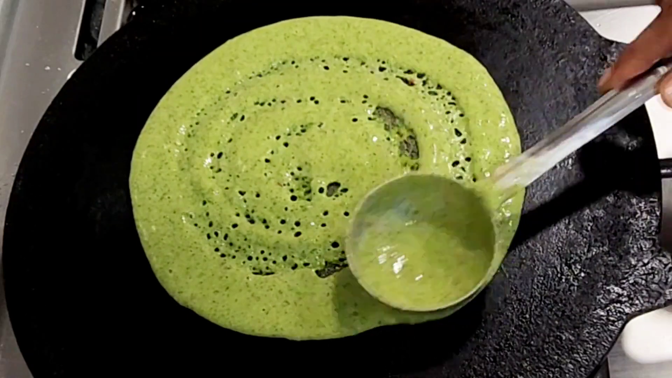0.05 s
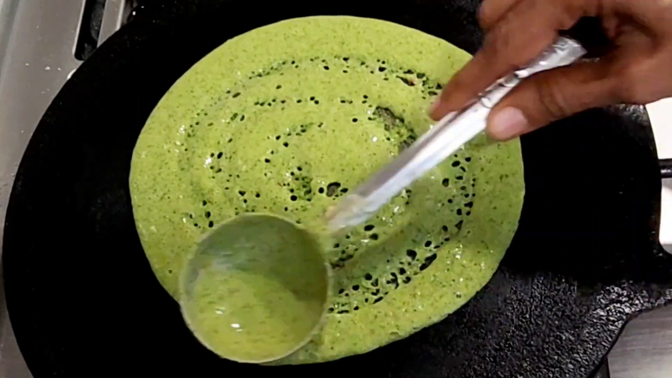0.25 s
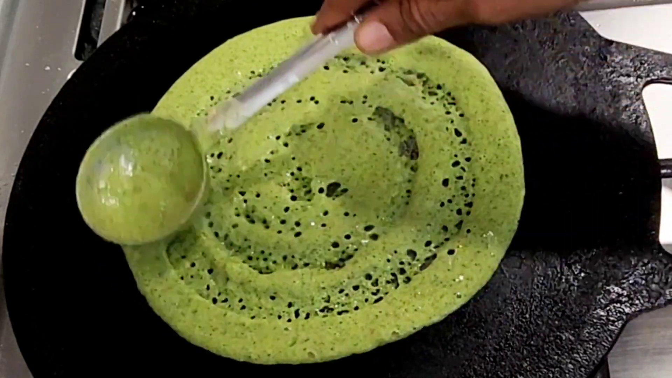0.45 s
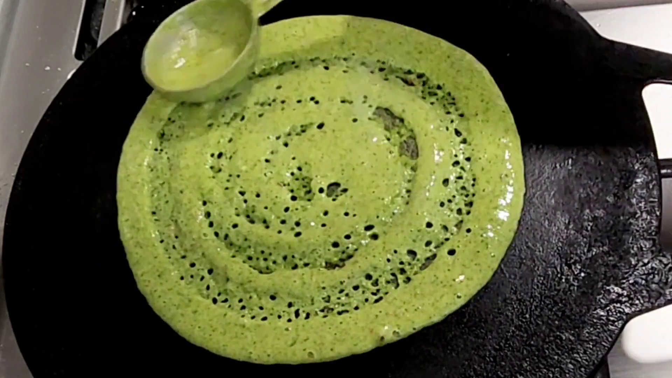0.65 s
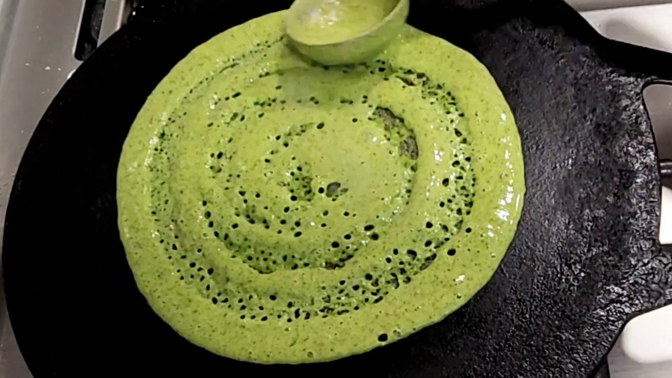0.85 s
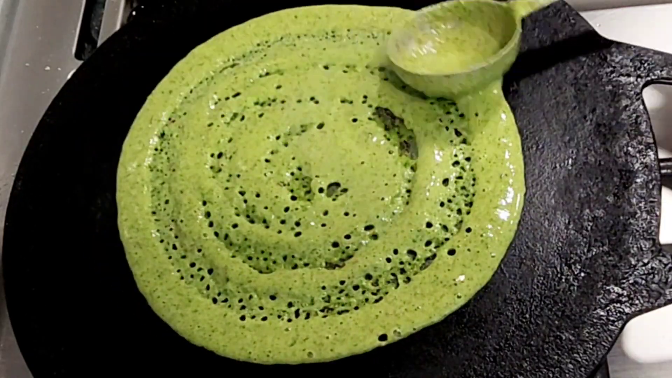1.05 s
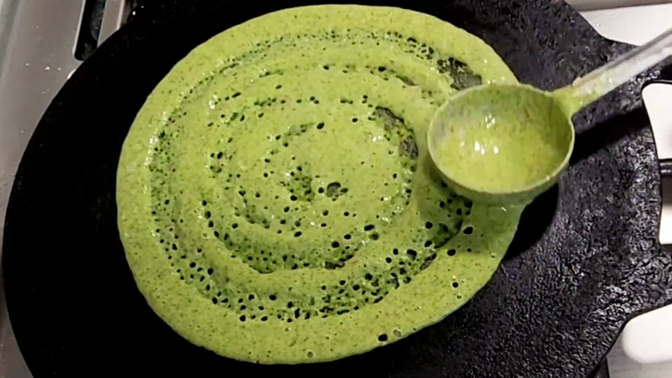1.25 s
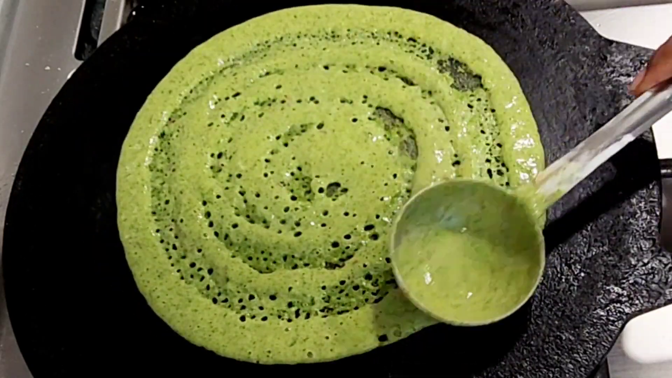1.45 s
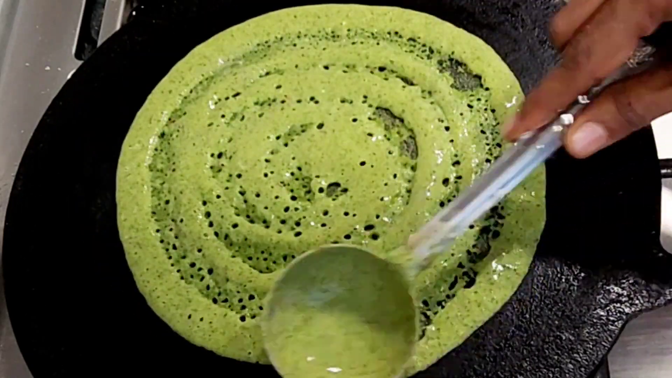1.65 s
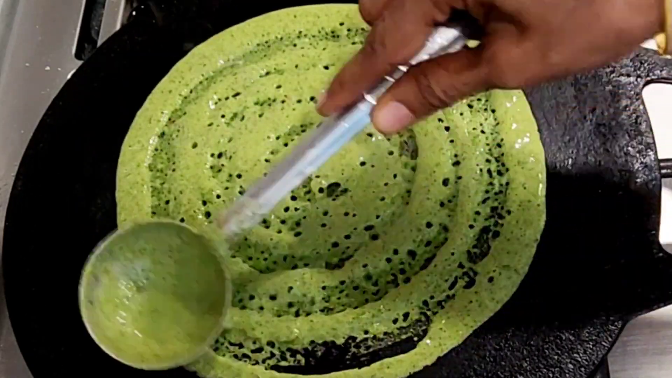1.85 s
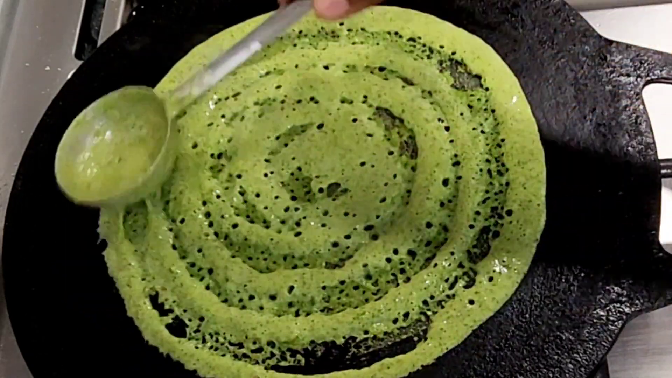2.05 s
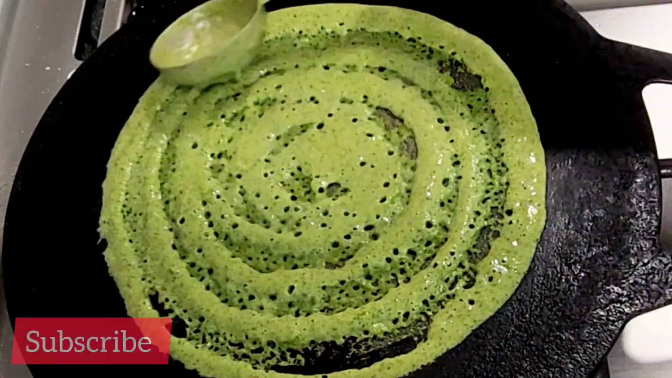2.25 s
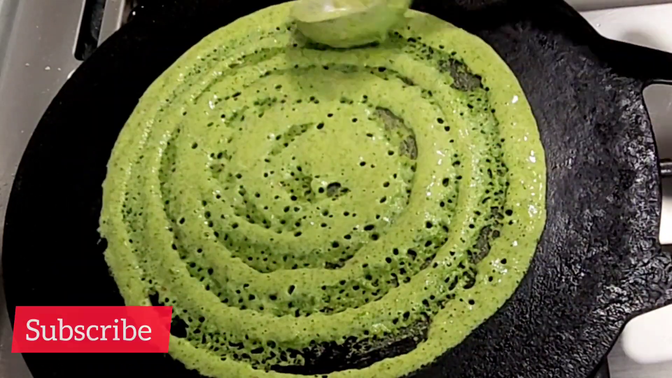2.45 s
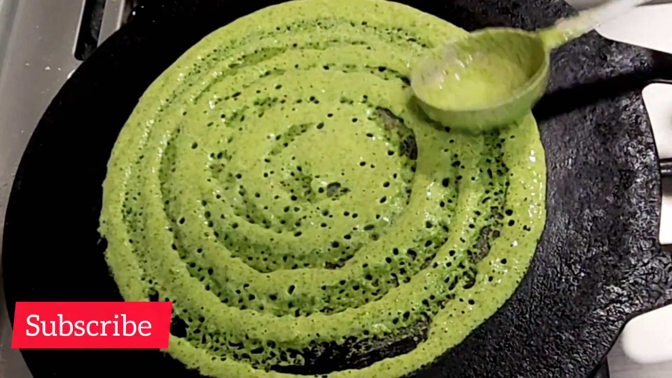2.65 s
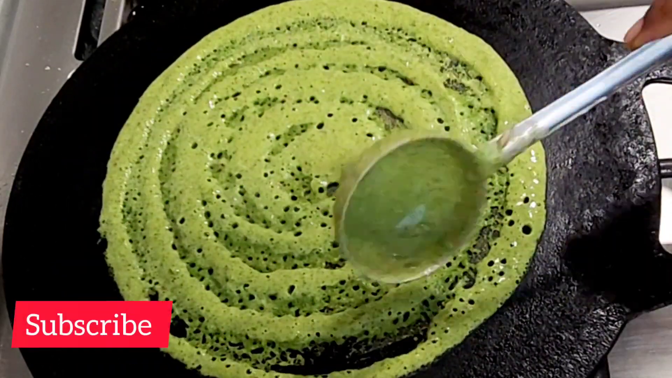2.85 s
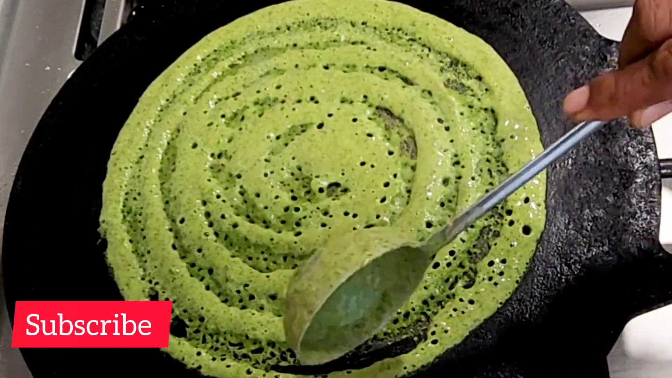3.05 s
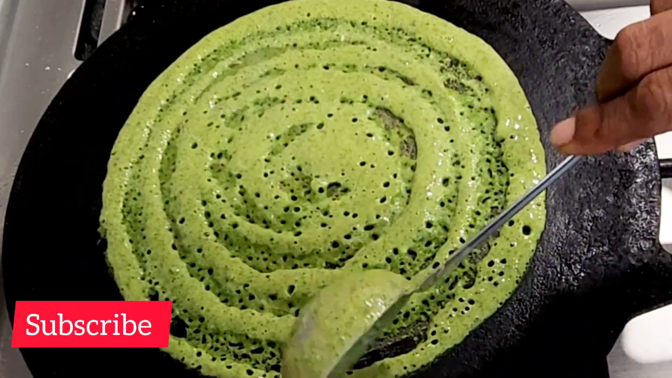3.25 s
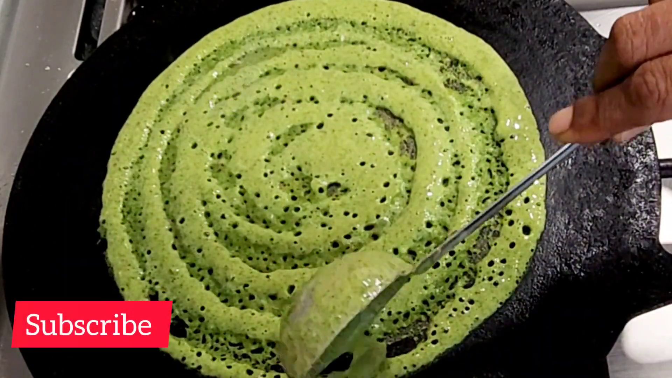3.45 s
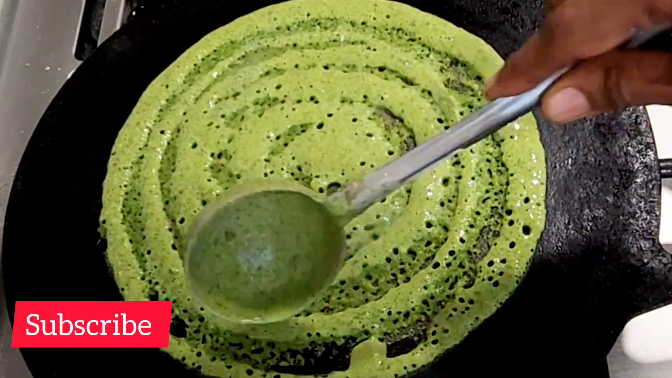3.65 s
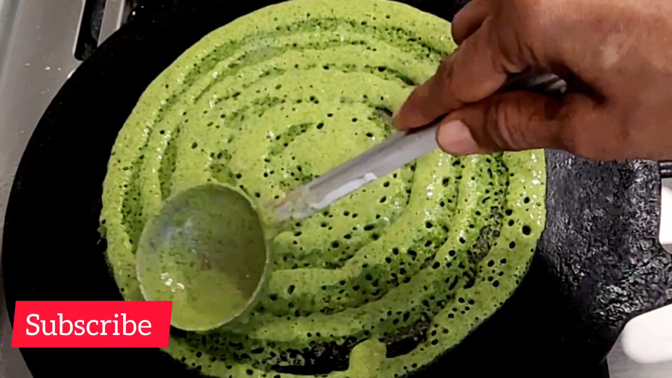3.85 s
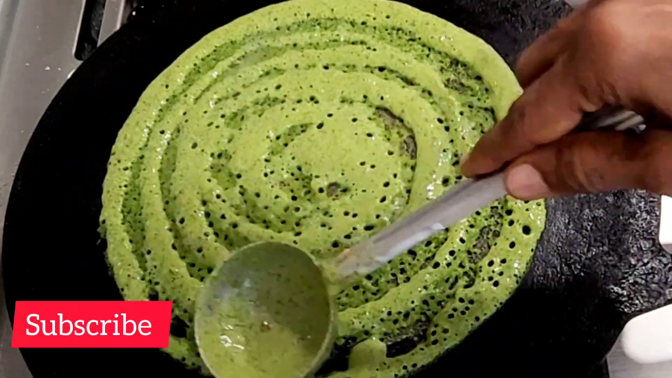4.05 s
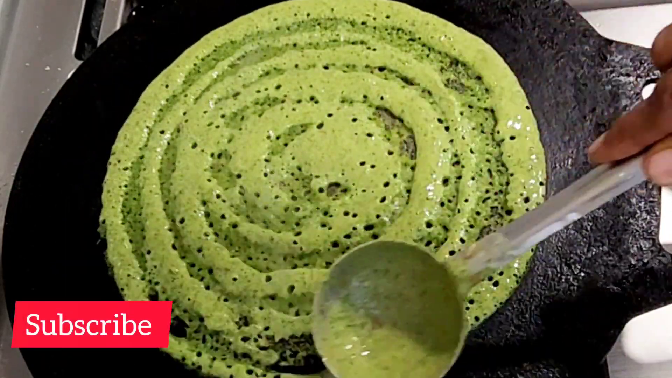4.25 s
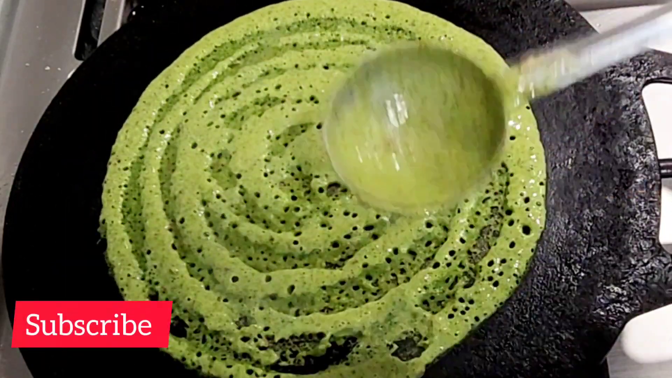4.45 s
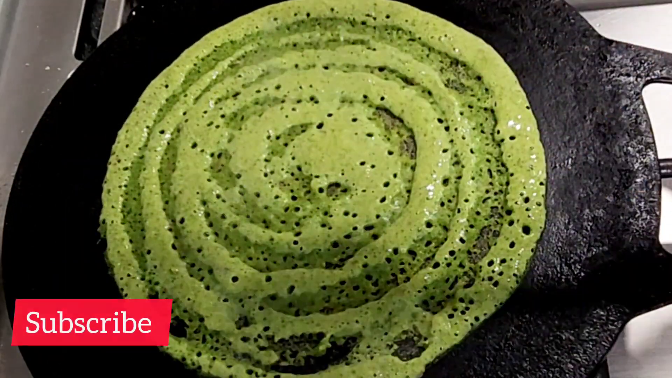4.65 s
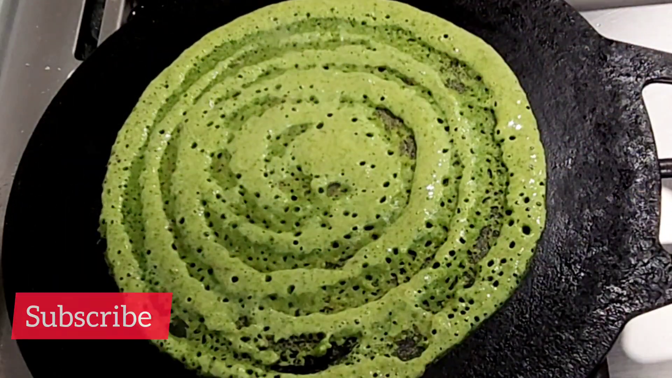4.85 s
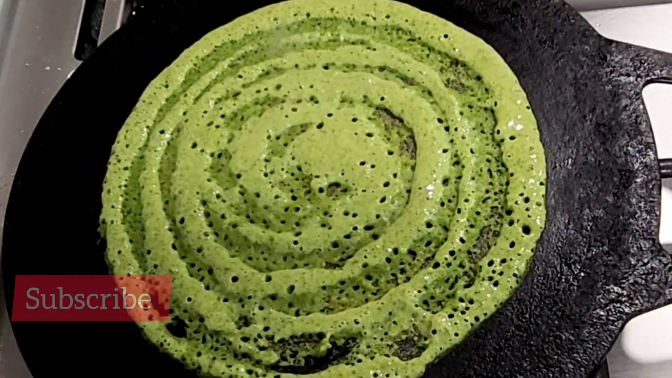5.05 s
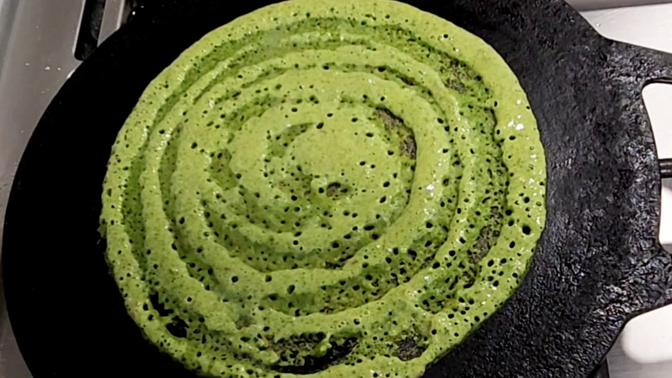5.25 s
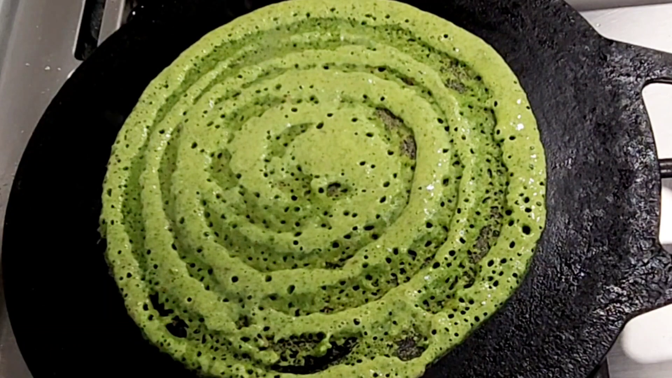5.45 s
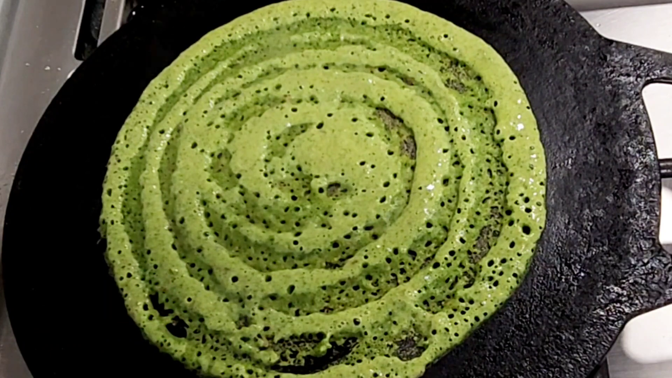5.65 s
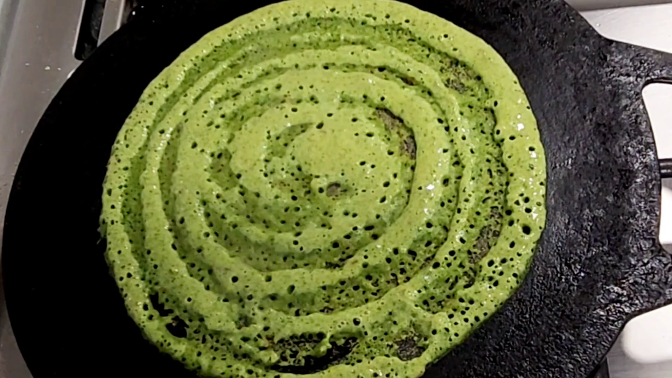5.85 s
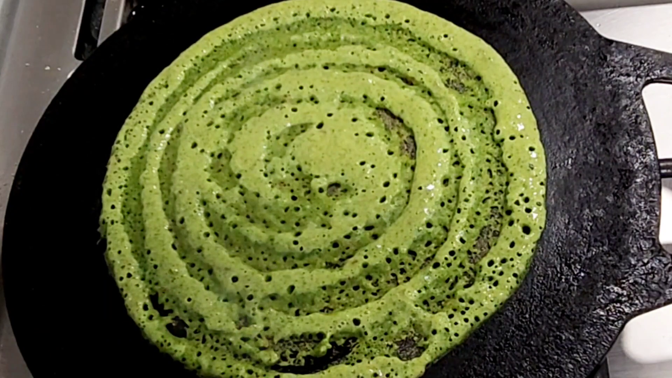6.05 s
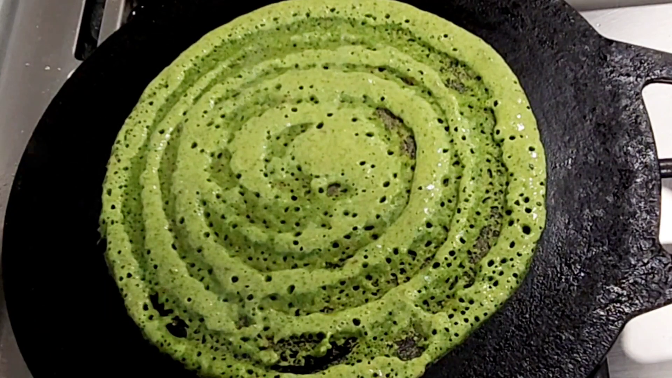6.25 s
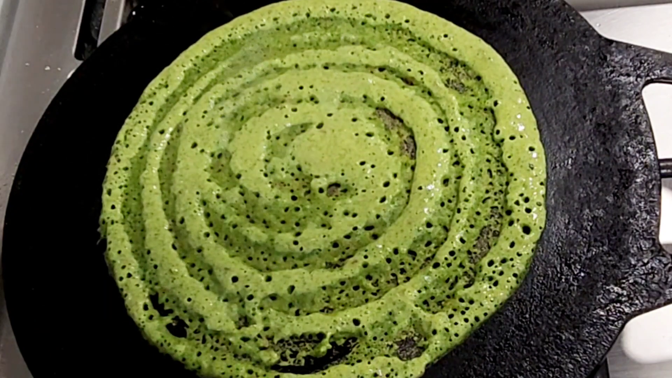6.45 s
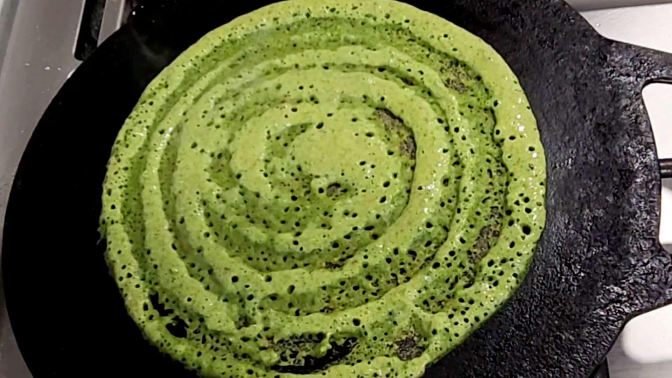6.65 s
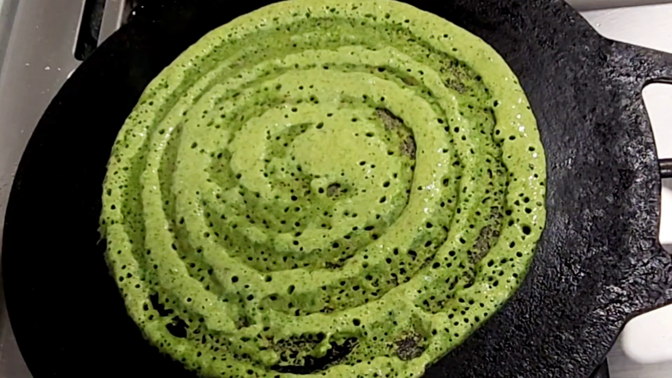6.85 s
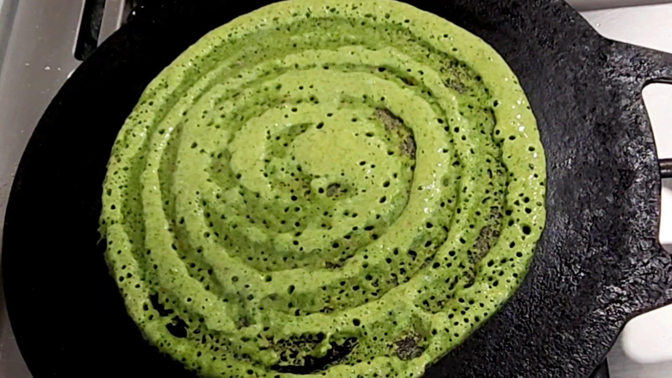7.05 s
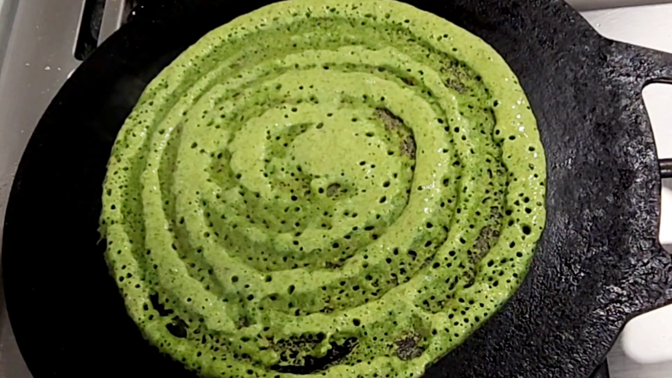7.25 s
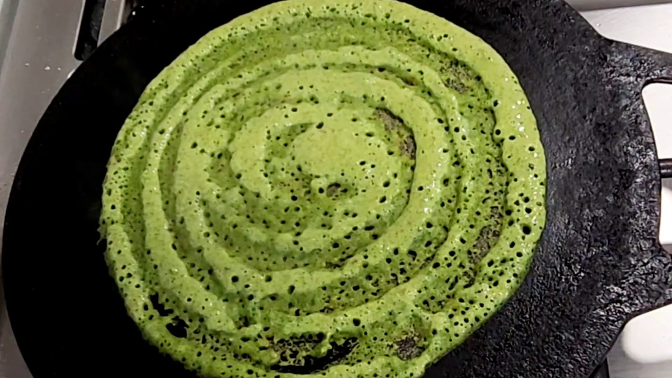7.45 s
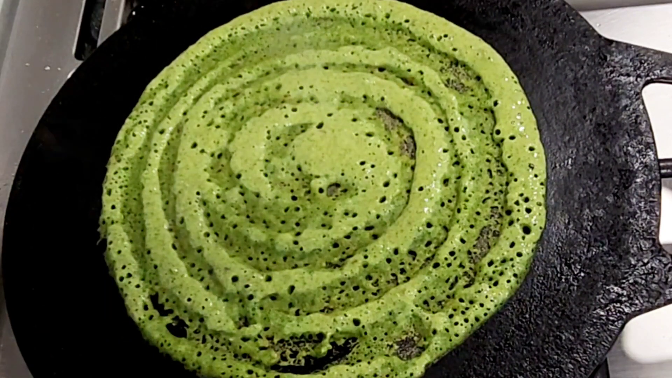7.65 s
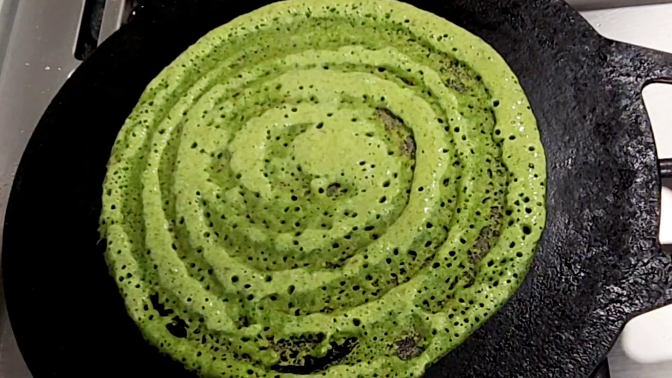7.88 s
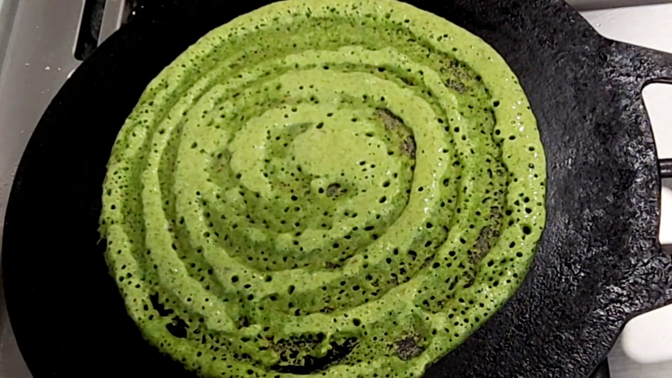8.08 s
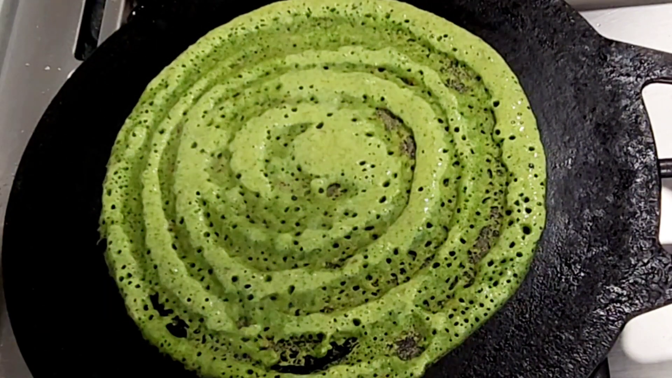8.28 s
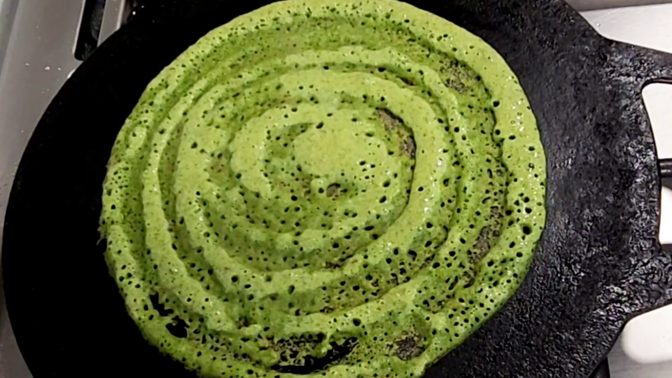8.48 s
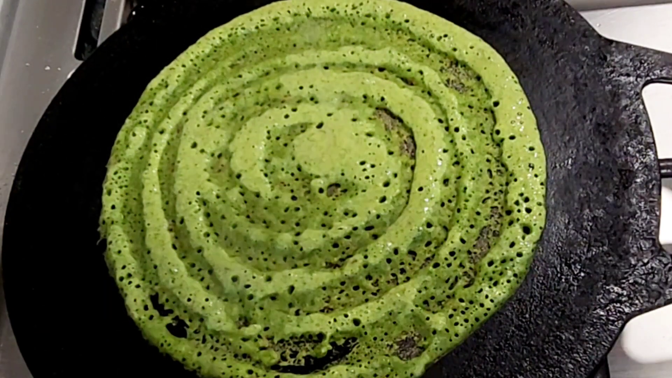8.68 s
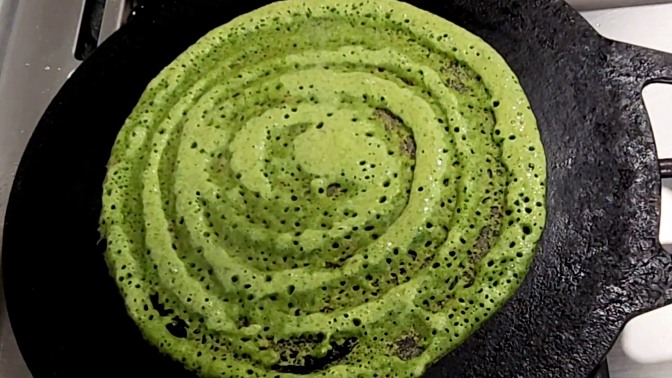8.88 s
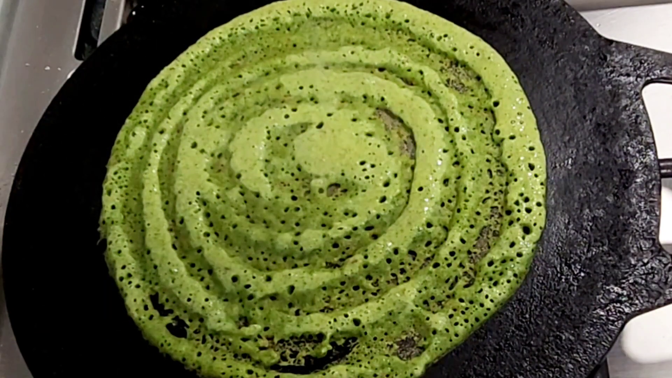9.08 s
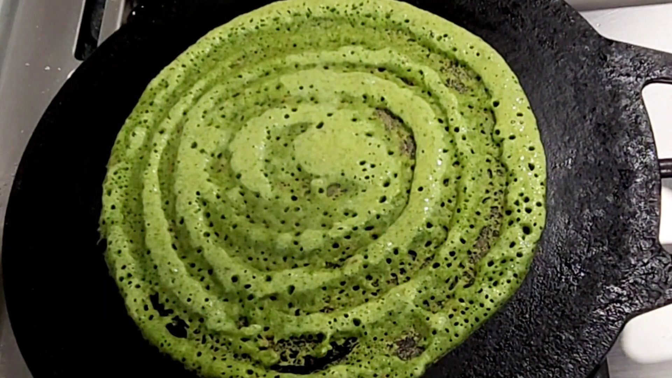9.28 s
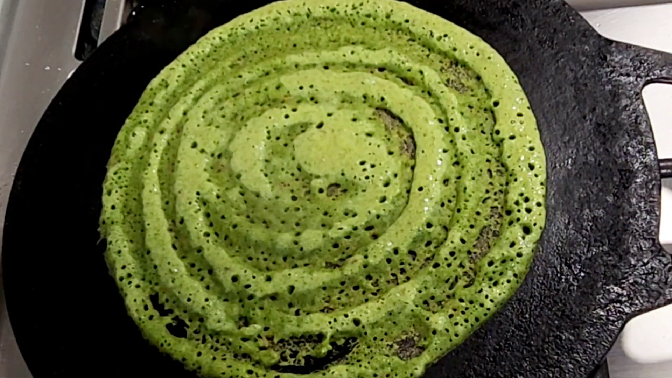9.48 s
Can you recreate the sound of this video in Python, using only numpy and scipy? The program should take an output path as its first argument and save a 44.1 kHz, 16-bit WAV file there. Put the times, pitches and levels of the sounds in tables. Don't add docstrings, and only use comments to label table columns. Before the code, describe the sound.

Heard close in stereo in a small kitchen, batter fries on hot iron. From 0 to 3 seconds the sizzle is loud, dense and bright, thickened by wet bubbling, swelling slightly around 0.3 and 2.4, with strong pops near 0.4, 0.8, 1.0, 1.4 and 2.9. At about 3.5 a steel ladle knocks the griddle: a firm, short, dull-metallic clank with tiny bounces. The frying then weakens and dries, with sharp spits standing out. Near 5.7 the ladle is set on the counter with a bright, thin clink and quick rattle. A barely noticeable soft thud follows at 6.5. From 7 to 9.5 the sizzle is quiet and patchy, with clumps of fine crackles and small steam spurts, strongest near 7.5, and a faint iron tick at 9.3. A low, steady gas flame and room rumble lies underneath, more exposed towards the end.

```python
import sys
import numpy as np
from scipy import signal
from scipy.fft import rfft, irfft
from scipy.io import wavfile
from scipy.ndimage import uniform_filter1d

SR = 44100
rng = np.random.default_rng(int(sys.argv[2]) if len(sys.argv) > 2 else 0)


def nominal_scale(level):
    x = np.asarray(level, float) / 20
    return 10 ** x


def unload_audio(sound):
    columns = np.transpose(np.atleast_2d(sound))
    steps = np.round(np.clip(columns, -1, 1) * 32767)
    wavfile.write(sys.argv[1], SR, steps.astype(np.int16))


N = 419832
PORT_LAG_SAMPLES = 4
SETS_S = 3.7
VEIL_CLEARS_S = 2


def at_hz(points, hz):
    table_hz, table_db = np.array(points).T
    return np.interp(np.log(hz + 1), np.log(table_hz), table_db)


def rms_one(x):
    return x / np.sqrt(np.mean(x ** 2) + 1e-20)


def colour(x, points, share=1):
    hz = np.arange(N // 2 + 1) * SR / N
    return irfft(rfft(x) * nominal_scale(share * at_hz(points, hz)), N)


def flatten(x):
    spectrum = rfft(x)
    power = uniform_filter1d(np.abs(spectrum) ** 2, size=4001)
    return rms_one(irfft(spectrum / np.sqrt(power + 1), N))


def drift(rate_hz):
    r = np.exp(-2 * np.pi * rate_hz / SR)
    noise = rng.standard_normal(N + SR)
    return rms_one(signal.lfilter([1], [1, -2 * r, r * r], noise)[SR:])


def burst(hz, width_ms, sweep, lag_ms):
    t_ms = np.arange(256) / SR * 1000 - 1.5 - np.array([[-lag_ms / 2], [lag_ms / 2]])
    khz = hz / 1000

    def snap(t_ms):
        u = t_ms / width_ms
        bell = np.exp(-u ** 2 / np.where(u > 0, 2.2, 1))
        return bell * np.sin(2 * np.pi * khz * (t_ms + sweep * u * t_ms / 2))

    return snap(t_ms) + nominal_scale(-12) * snap(t_ms - 1.4) + nominal_scale(-22.5) * snap(t_ms - 2.3)


def crackle(per_ms, spread_db, low_hz, high_hz, cycles, places):
    born = rng.random(N) < per_ms * 1000 / SR
    size_db = spread_db * np.minimum(rng.exponential(1, N), 4.5)
    sizes = born * nominal_scale(size_db) * rng.choice([-1, 1], N)
    place = rng.integers(0, places, N)
    out = 0
    for k, hz in enumerate(np.geomspace(low_hz, high_hz, places)):
        lag, side = rng.standard_normal(2)
        shape = burst(hz, width_ms=cycles / hz * 1e3, sweep=0.52, lag_ms=.1 + 0.074 * lag)
        shape = shape * nominal_scale([[1.7 * side], [-1.5 * side]])
        out = out + signal.oaconvolve((sizes * (place == k))[None], shape, axes=1)[:, :N]
    return out


# start_s [s, centre], lift_db [dB]
SPURTS = [(2.9, 3), (4.22, 2), (5.58, 2.5), (6.2, 0), (6.8, 2.5), (7.1, 3.5), (7.5, 8), (7.77, 4),
          (8.02, 6), (8.26, 6.5), (8.4, 6), (8.7, 6), (9.02, 2), (9.33, 5.5), (9.48, 3.5)]


def spurts():
    t = np.arange(N) / SR
    half_s = .04
    return sum(lift_db * np.exp(-((t - start_s) / half_s) ** 2) for start_s, lift_db in SPURTS)


def veil(x):
    share, above_hz = 0.34, 9300
    top = signal.sosfiltfilt(signal.butter(2, above_hz, "high", fs=SR, output="sos"), x)
    return x - share * np.exp(-np.arange(N) / SR / VEIL_CLEARS_S) * top


# start_s [s], level_db [dB]
SIZZLE = [(0.0, -31), (0.28, -27.5), (0.8, -29.5), (1.22, -31.5), (1.6, -30), (2.02, -29), (2.4, -28),
          (3.0, -31.5), (3.9, -35), (5.2, -37.5), (6.1, -41.5), (6.8, -43.5), (7.25, -45.5), (7.65, -46),
          (8.2, -48), (8.55, -50.5), (9.0, -50), (9.52, -52.5)]
# pitch_hz [Hz], level_db [dB per Hz]
DRY = [(300, -28), (700, -13), (1170, -9.5), (1400, -4.5), (1660, -7), (1970, -3.5), (2350, -5), (3500, -1),
       (6000, -1), (7500, 0.5), (9500, -4.5), (13000, -1.5), (15900, -2), (17000, -8)]
# pitch_hz [Hz], level_db [dB per Hz]
WET = [(200, -10.5), (420, -9.5), (600, -7), (800, -6), (1400, 0.5), (2000, -.5), (3200, -3), (6000, -12.5)]


def sizzle():
    t = np.arange(N) / SR
    dry_db = np.interp(t, *np.transpose(SIZZLE))
    wet_db = dry_db - 1.6 - 3.17 * t
    per_ms = np.clip(8.0 * nominal_scale(.9 * (dry_db + 30)), .1, 20)
    unrest = np.clip(.6 - .04 * (dry_db + 30), .3, 2)
    surge_db = unrest * (.5 * drift(6) + 2.3 * drift(22) + 5.2 * drift(120))
    clumps = per_ms * nominal_scale(surge_db)

    left, right, shared = rng.standard_normal((3, N))
    common = np.array([shared, np.roll(shared, PORT_LAG_SAMPLES)])
    hiss = (np.array([left, right]) + .5 * common) * nominal_scale(0.4 * surge_db)

    dry = crackle(clumps, spread_db=3.5, low_hz=2000, high_hz=13000, cycles=0.82, places=22)
    wet = crackle(clumps * .4, spread_db=3.5, low_hz=707, high_hz=3300, cycles=0.76, places=8)
    dry = colour(flatten(dry / np.sqrt(per_ms)) + nominal_scale(-9.0) * hiss, DRY)
    wet = colour(flatten(wet / np.sqrt(per_ms)) + hiss, WET)
    lift_db = spurts()
    bright = nominal_scale(dry_db + 0.8 * lift_db + 3.0) * veil(rms_one(dry))
    return bright + nominal_scale(wet_db + .6 * lift_db) * rms_one(wet)


# pitch_hz [Hz], likeness [-1..1]
LIKENESS = [(60, 0.99), (180, 1), (550, 0.7), (1650, -0.27), (4970, 0.09), (15000, -0.03)]
# pitch_hz [Hz], level_db [dB per Hz]
RUMBLE = [(15, -18), (45, -1), (120, -0.5), (150, -7.5), (205, -17), (246, -7), (300, -16), (430, -24.5),
          (610, -19.5), (800, -20.5), (1050, -30), (1600, -29), (1880, -24), (2200, -29.5), (3000, -42)]


def rumble():
    mid, side = rng.standard_normal((2, N))
    hz = np.arange(N // 2 + 1) * SR / N
    alike = np.clip(at_hz(LIKENESS, hz), 0, 1)
    both = np.sqrt(1 + alike) * rfft(mid) + np.sqrt(1 - alike) * rfft(side) * [[1], [-1]]
    level_db = -39.5 + 0.94 * drift(3)
    return nominal_scale(level_db) * rms_one(colour(irfft(both, N), RUMBLE))


def spits():
    per_s, over_sizzle_db, spread_db = 22.0, 16.5, 1.3
    grows_db_per_s = .5
    low_hz, high_hz = 3500, 15000
    gap, size, pitch = rng.random((150, 3)).T
    start_s = SETS_S + np.cumsum(.25 - .75 * np.log(1 - gap)) / per_s
    sizzle_db = np.interp(start_s, *np.transpose(SIZZLE))
    lift_db = np.interp(start_s * SR, np.arange(N), spurts())
    peak_db = sizzle_db + lift_db + over_sizzle_db + grows_db_per_s * (start_s - SETS_S)
    peak_db = peak_db - spread_db * (1 + np.log(1 - size)).clip(-2)
    rows = np.transpose([start_s, peak_db, low_hz + (high_hz - low_hz) * pitch])
    return rows[start_s < N / SR]


# [Hz, centre]
POPS = [(0.4229, -10, 4630), (0.8082, -5, 7290), (1.0306, -10, 7590), (1.4092, -8.5, 7330),
        (2.8513, -8, 5620), (2.8858, -11, 13000), (3.7484, -14, 12700), (3.9325, -13, 12800),
        (4.0058, -14, 7110), (4.2552, -12, 12800), (4.464, -11.5, 12800), (4.8284, -20, 12600),
        (4.9027, -17, 7460), (5.0848, -18, 7150), (5.1836, -18, 7210), (5.3986, -15, 12400),
        (5.4345, -17, 14600), (5.6496, -18.5, 4130), (5.9494, -14.5, 14700), (5.9853, -19, 14700),
        (6.0851, -21, 15000), (6.1907, -17, 13100), (6.4068, -13, 14800), (6.545, -22, 7260),
        (6.7595, -24, 6080), (7.1127, -21, 12700), (7.7653, -20, 14900), (7.8246, -19, 8040),
        (8.0536, -31, 7120), (9.3182, -23, 11300)]


def pops():
    pan_db, pan_spread_db = 5.5, 1.5
    muffle_db = 3
    size = 600
    age_s = np.arange(size) / SR
    puff = np.exp(-age_s / 0.0019) * (1 - np.exp(-age_s / .0012))
    out = np.zeros((2, N + size))
    for start_s, peak_db, pitch_hz in [*POPS, *spits()]:
        at = round((start_s - .0002) * SR)
        noise = rng.standard_normal((2, size))
        lag, side = noise[:, 0]
        sound = .6 * noise * puff
        sweep = 0.64 * burst(8300, width_ms=0.2, sweep=0.65, lag_ms=0.096 + 0.047 * lag)
        own_hz = np.clip(pitch_hz, 4000, 14500)
        sweep = sweep + 0.58 * burst(own_hz, width_ms=0.194, sweep=0.069, lag_ms=0.097 + 0.061 * lag)
        sound[:, :sweep.shape[1]] += sweep / np.abs(sweep).max()
        side_db = (pan_db + pan_spread_db * side - 2.5) / 2
        level_db = peak_db + 2.0 - muffle_db * np.exp(-start_s / VEIL_CLEARS_S)
        out[:, at:at + size] += nominal_scale(level_db) * sound * nominal_scale([[side_db], [-side_db]])
    band = signal.butter(2, [2200, 15800], "band", fs=SR, output="sos")
    return signal.sosfilt(band, out[:, :N])


def ring(clicks, hz, t60_s):
    r = nominal_scale(-60 / (t60_s * SR))
    w = 2 * np.pi * hz / SR
    return signal.lfilter([0, np.sin(w)], [1, -2 * r * np.cos(w), r * r], clicks + 1e-18)


def struck(hits, modes, end_s, rattle_db, rattle_s, crack_db, crack_hz, damp_s=0.033):
    start, size = round(hits[0][0] * SR), SR // 4
    at = [round(start_s * SR) - start for start_s, level_db in hits]
    blows = np.zeros(size)
    blows[np.maximum(at, 0)] = nominal_scale(np.array(hits)[:, 1])
    t = (start + np.arange(size)) / SR
    damped = np.exp(-np.maximum(t - end_s, 0) / damp_s)
    rattle = signal.lfilter([1], [1, -np.exp(-1 / (rattle_s * SR))], blows) * damped

    sound = 0
    for pitch_hz, level_db, t60_s in modes:
        shared, own = rng.standard_normal(size), rng.standard_normal((2, size))
        alike = np.exp(-(pitch_hz / 900) ** 2)
        shake = alike * shared + np.sqrt(1 - alike ** 2) * own
        sign = np.maximum(rng.choice([-1, 1], size), np.sign(100 - pitch_hz))
        sharp = blows * sign * nominal_scale(2.4 * shake - 0.3)
        sound = sound + nominal_scale(level_db) * ring(sharp + nominal_scale(rattle_db) * rattle * shake, pitch_hz, t60_s)

    crack = signal.lfilter([1], [1, -np.exp(-1 / (0.0059 * SR))], blows) + nominal_scale(-14.5) * rattle
    band = signal.butter(1, [400, crack_hz], "band", fs=SR, output="sos")
    crack = crack * signal.sosfilt(band, rng.standard_normal((2, size)))
    out = np.zeros((2, N))
    out[:, start:start + size] = sound * damped + nominal_scale(crack_db) * crack
    return out


# start_s [s], level_db [dB]
KNOCK = [
    (3.470, -10.5),
    (3.474, -13.5),
    (3.478, -11.5),
    (3.490, -21),
    (3.522, -25),
]
# pitch_hz [Hz], level_db [dB], t60_s [s]
GRIDDLE = [(84, -16, 0.47), (115, -8.5, 0.086), (175, -16, .1), (250, -18, .12), (294, -13.5, 0.17),
           (345, -12.5, 0.12), (400, -20, .06), (470, -7.5, 0.044), (595, -1, 0.043), (703, -5.5, .04),
           (705, -23, .4), (793, -6.5, 0.049), (903, -9.5, 0.042), (1030, -11, 0.018), (1393, -16, .05),
           (1890, -14, 0.037), (2070, -18.5, .04), (2720, -9, .04), (3200, -21, .04), (3450, -15, 0.027),
           (3970, -14, .04), (5530, -11, 0.027), (7270, -8.5, .03)]


def ladle_knock():
    return struck(KNOCK, GRIDDLE, end_s=3.67, rattle_db=-38, rattle_s=0.045, crack_db=0.5, crack_hz=5000)


# start_s [s], level_db [dB]
SET_DOWN = [
    (5.688, -41),
    (5.694, -15.5),
    (5.698, -22),
    (5.712, -22.5),
    (5.752, -27.5),
]
# pitch_hz [Hz], level_db [dB], t60_s [s]
LADLE = [(60, -10.5, 0.37), (80, -21, .15), (550, -11.5, 0.056), (694, -15, 0.046), (830, -7, 0.059),
         (890, -9, .05), (1500, -16, 0.066), (2110, -20, 0.039), (2778, -15, .1), (2979, -5, .04),
         (3037, -11, 0.14), (3180, -10.5, .06), (4114, -13, .15), (4170, -4, 0.05), (4470, -13, 0.054),
         (5120, -10, .07), (6442, -15, 0.17), (6543, 0, 0.045), (6730, -11, .1), (7700, -6, .025),
         (8000, -10, 0.045), (9370, -6.5, .035), (11200, -19, .04), (12600, -7, .025)]


def ladle_set_down():
    return struck(SET_DOWN, LADLE, end_s=5.795, rattle_db=-39, rattle_s=0.059,
                  crack_db=-1.5, crack_hz=11000, damp_s=.014)


# start_s [s], level_db [dB]
THUD = [
    (6.485, -37),
    (6.53, -38),
]
# pitch_hz [Hz], level_db [dB], t60_s [s]
THUD_MODES = [(250, -5, .08), (295, -1.5, 0.065), (420, -7, .05), (650, -5, .05), (850, -8, .04)]


def kitchen_thud():
    return struck(THUD, THUD_MODES, end_s=6.6, rattle_db=-30, rattle_s=.03, crack_db=-20, crack_hz=1500)


# start_s [s], level_db [dB]
TICK = [(9.264, -34)]
# pitch_hz [Hz], level_db [dB], t60_s [s]
TICK_MODE = [(1880, -2, .015)]


def iron_tick():
    return struck(TICK, TICK_MODE, end_s=10.0, rattle_db=-38, rattle_s=.03, crack_db=-20, crack_hz=3000)


def kitchen(x, t60_s):
    t = np.arange(SR // 2) / SR
    own, shared = rng.standard_normal((2, len(t))), rng.standard_normal(len(t))
    split = np.exp(-2 * np.pi * 600 / SR)
    noise = own + signal.lfilter([1 - split], [1, -split], shared - own)
    tail = signal.lfilter([1], [1, -.3], noise * nominal_scale(-60 * t / t60_s) * (t > .003))
    tail = tail / np.sqrt(np.sum(tail ** 2) / 2)
    return signal.oaconvolve(x, tail, axes=1)[:, :N]


def scene():
    stove = sizzle() + pops() + ladle_knock() + ladle_set_down() + kitchen_thud() + iron_tick()
    return stove + nominal_scale(-13.5) * kitchen(stove, t60_s=0.261) + rumble()


def low_pass(x):
    return signal.sosfilt(signal.butter(12, 16610, fs=SR, output="sos"), x)


# pitch_hz [Hz], left_right_db [dB]
PORTS = [(60, 0), (130, 2), (290, 2.5), (640, 3.5), (1410, 3.5), (3100, 2.5), (6820, 3), (15000, 5.5)]
# pitch_hz [Hz], level_db [dB]
TOP = [(15850, 0), (16000, -48)]


def record(dry):
    left = colour(dry[0], PORTS, share=0.57)
    right = colour(dry[1], PORTS, share=-0.39)
    ports = np.clip(np.array([left, right]), -1, 1)
    return low_pass(colour(ports, TOP))


dry = scene()
out = record(dry)
unload_audio(out)
```